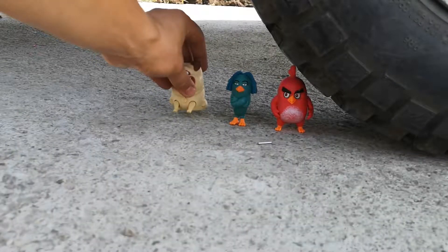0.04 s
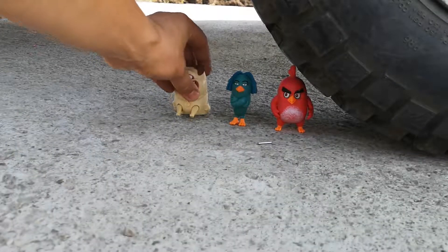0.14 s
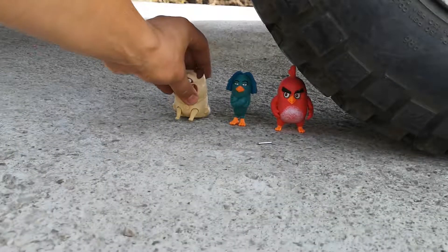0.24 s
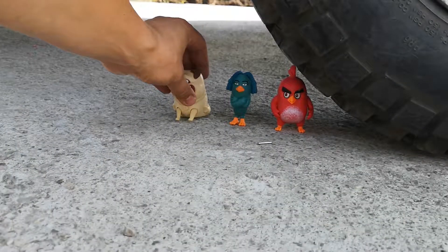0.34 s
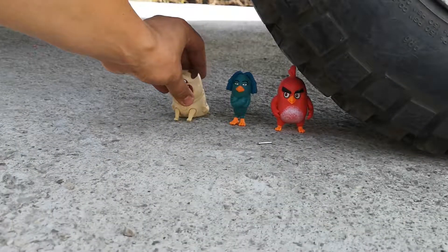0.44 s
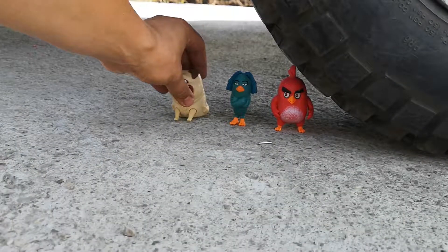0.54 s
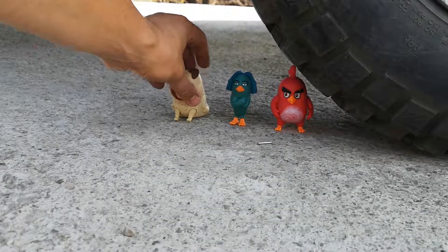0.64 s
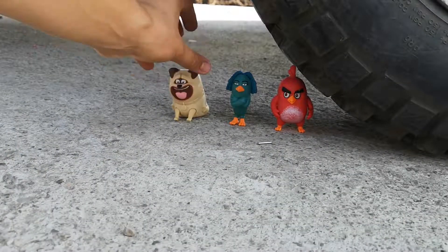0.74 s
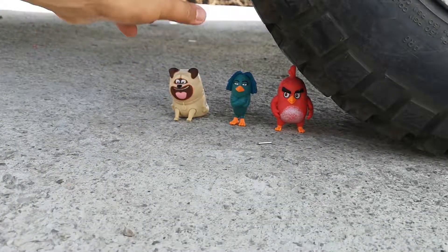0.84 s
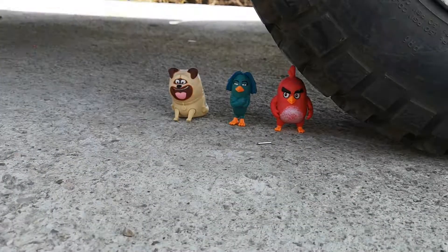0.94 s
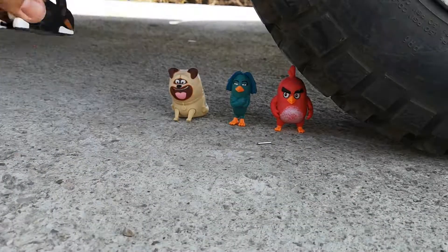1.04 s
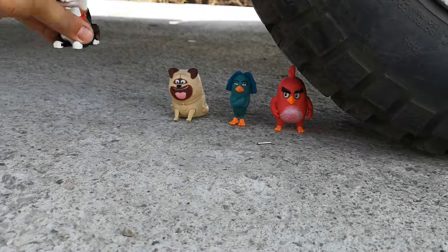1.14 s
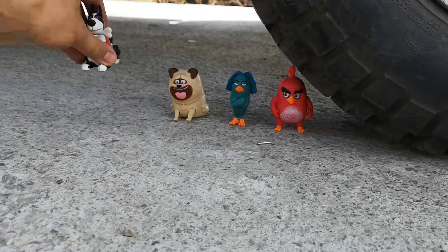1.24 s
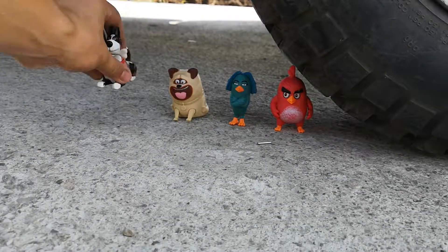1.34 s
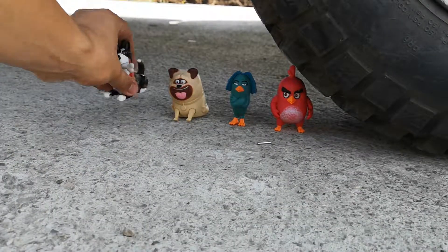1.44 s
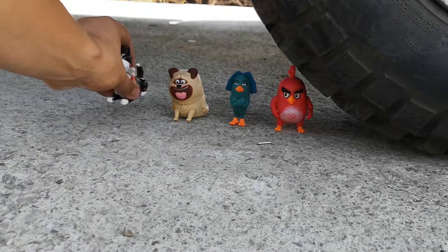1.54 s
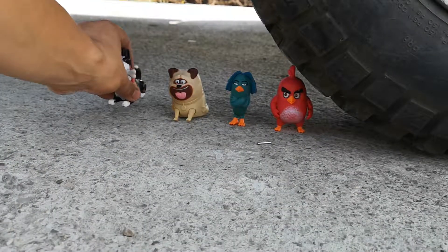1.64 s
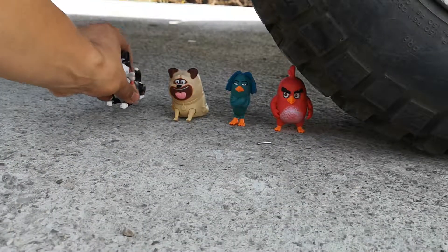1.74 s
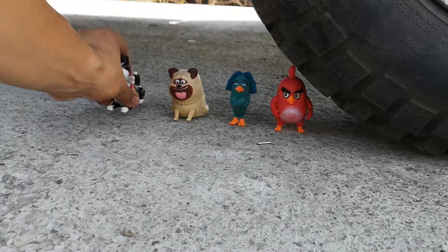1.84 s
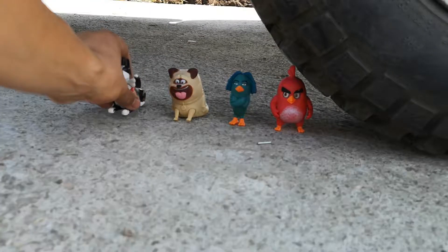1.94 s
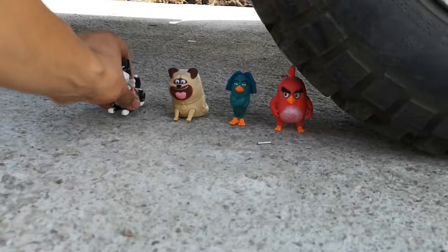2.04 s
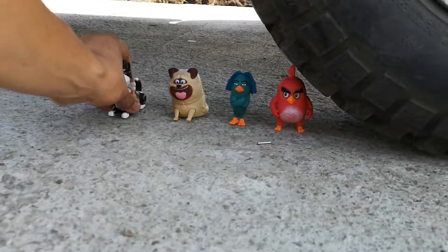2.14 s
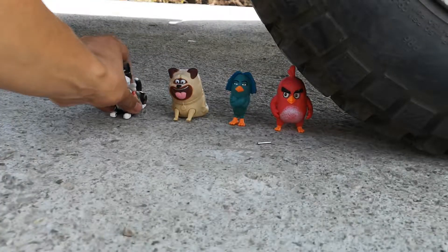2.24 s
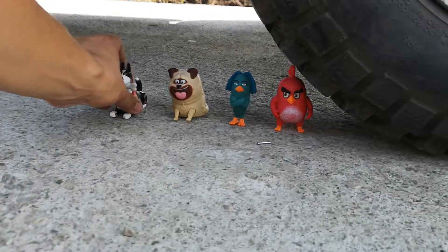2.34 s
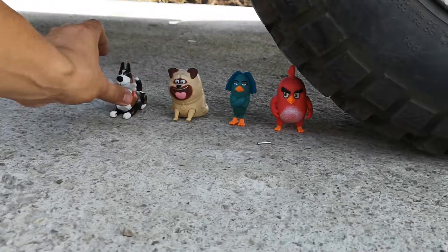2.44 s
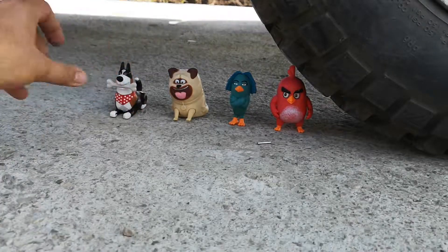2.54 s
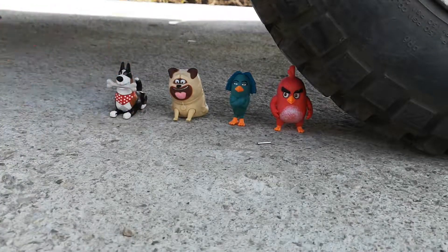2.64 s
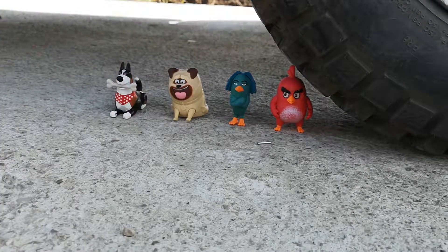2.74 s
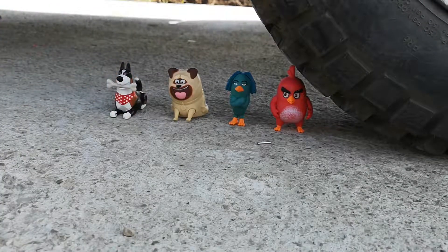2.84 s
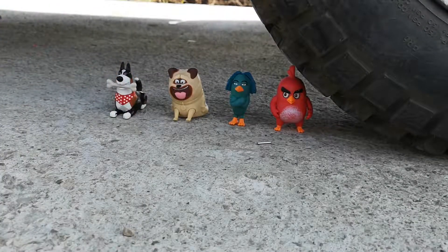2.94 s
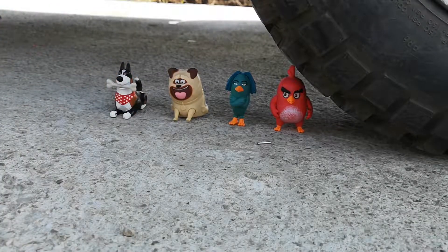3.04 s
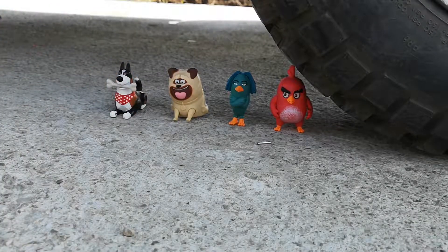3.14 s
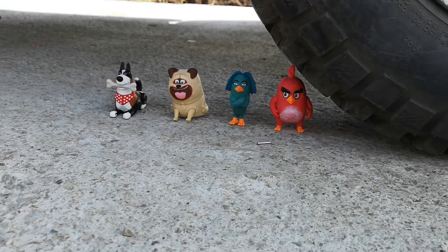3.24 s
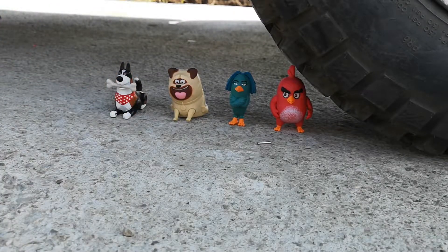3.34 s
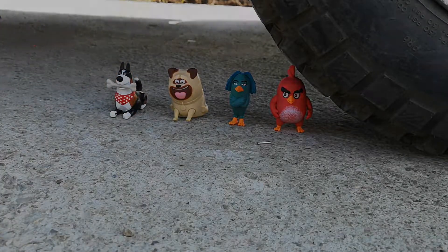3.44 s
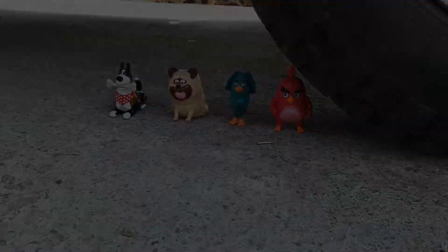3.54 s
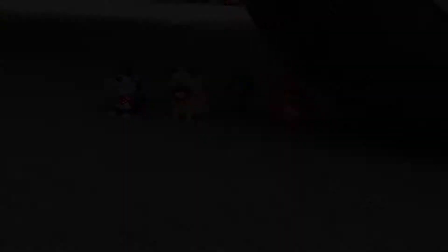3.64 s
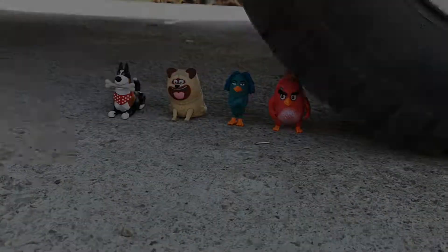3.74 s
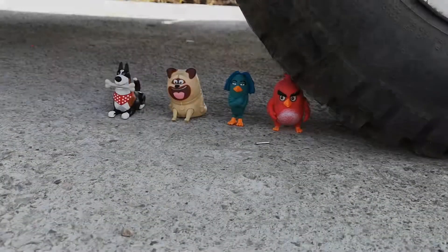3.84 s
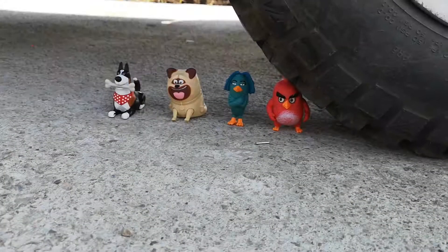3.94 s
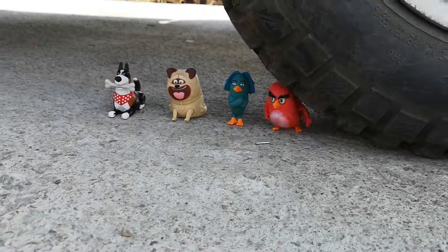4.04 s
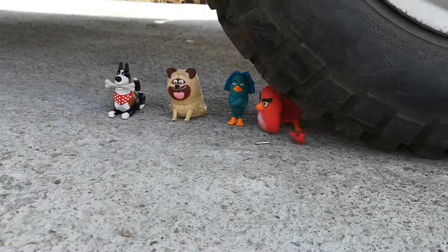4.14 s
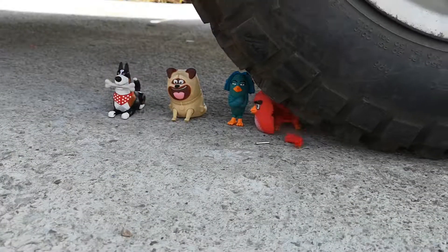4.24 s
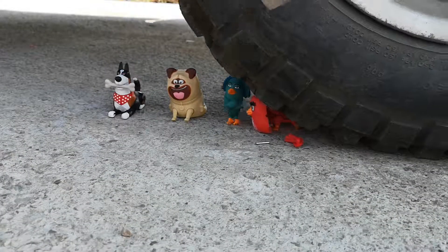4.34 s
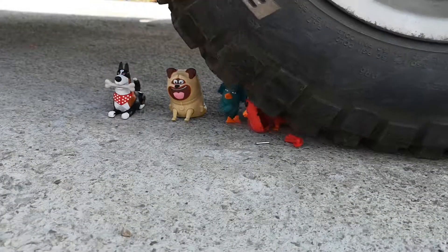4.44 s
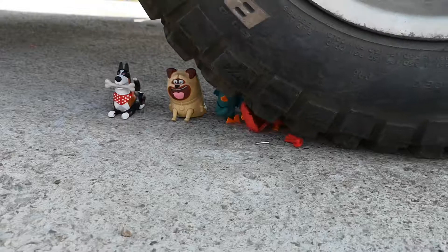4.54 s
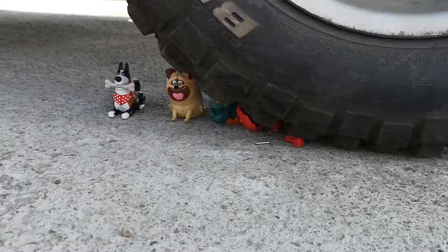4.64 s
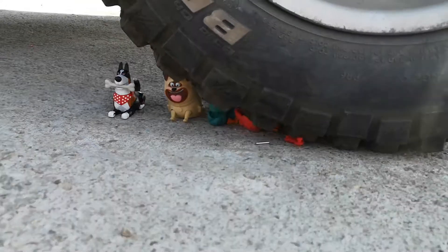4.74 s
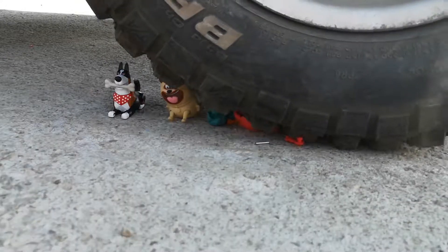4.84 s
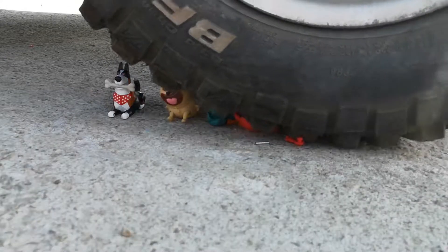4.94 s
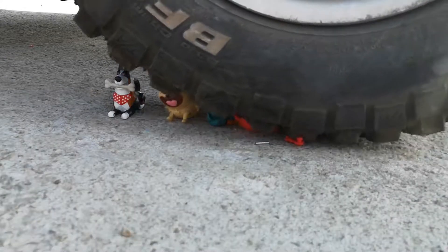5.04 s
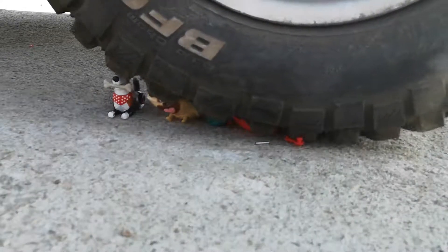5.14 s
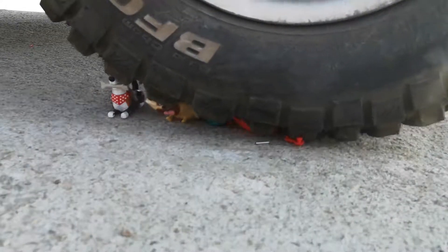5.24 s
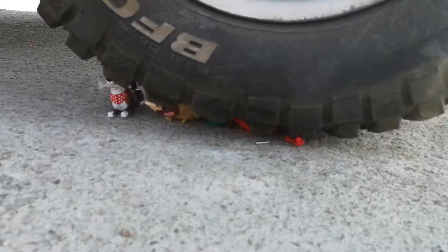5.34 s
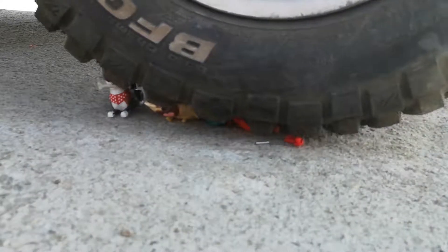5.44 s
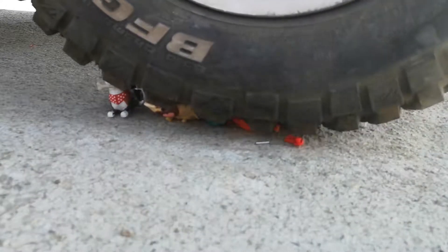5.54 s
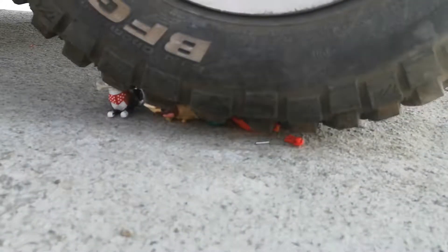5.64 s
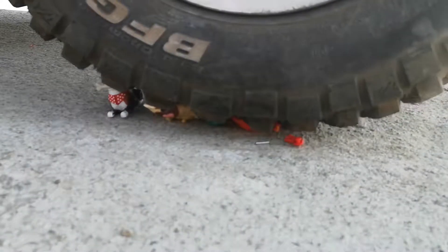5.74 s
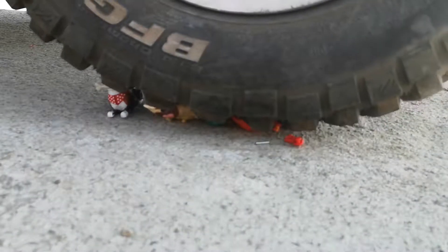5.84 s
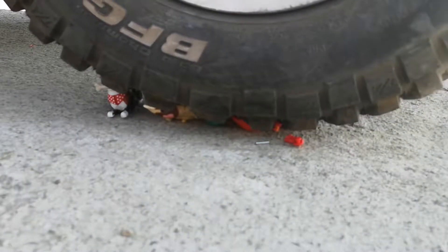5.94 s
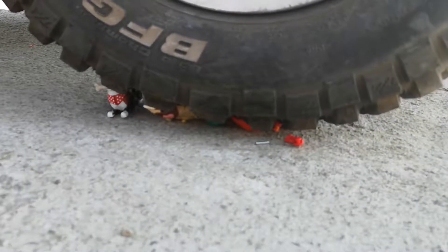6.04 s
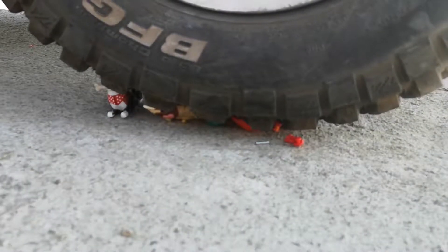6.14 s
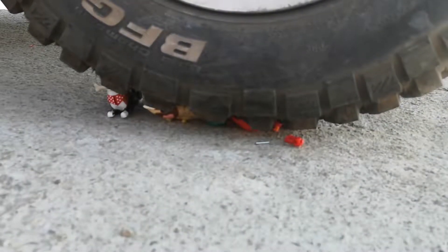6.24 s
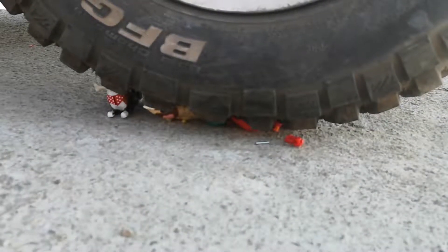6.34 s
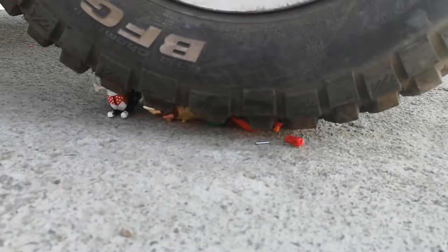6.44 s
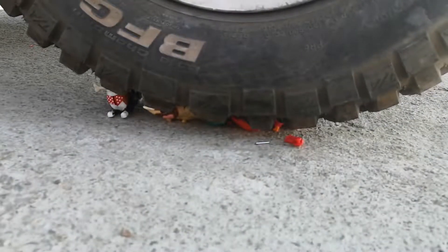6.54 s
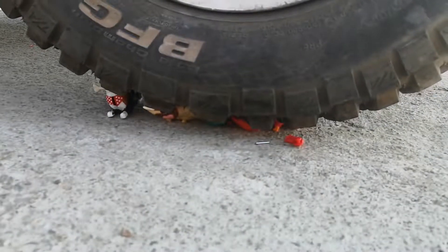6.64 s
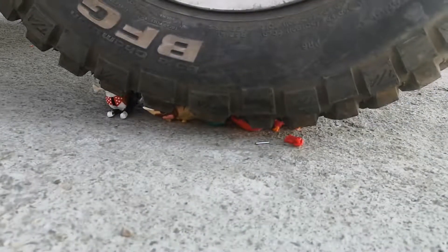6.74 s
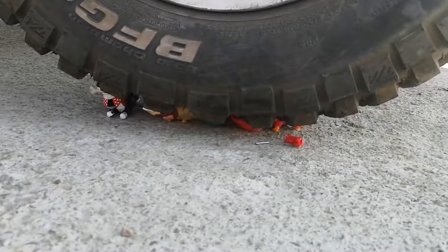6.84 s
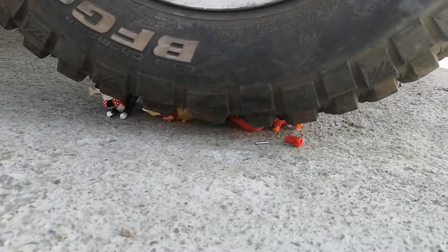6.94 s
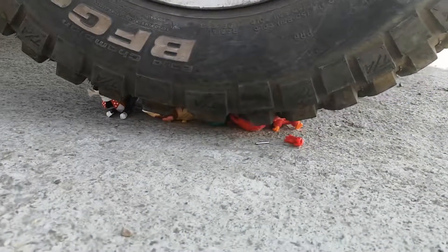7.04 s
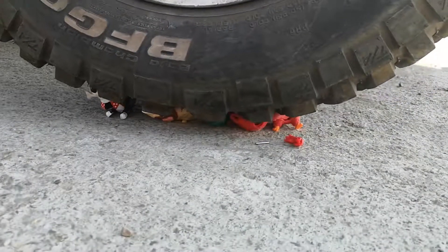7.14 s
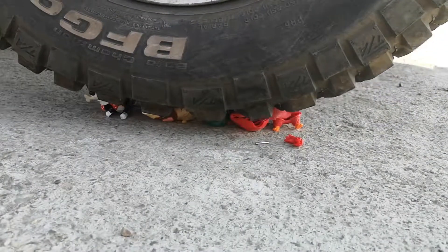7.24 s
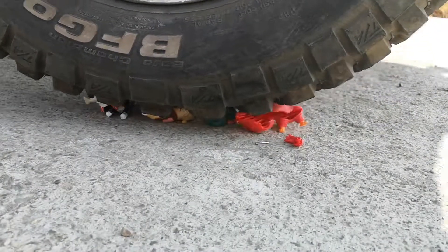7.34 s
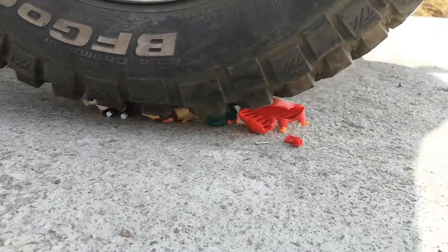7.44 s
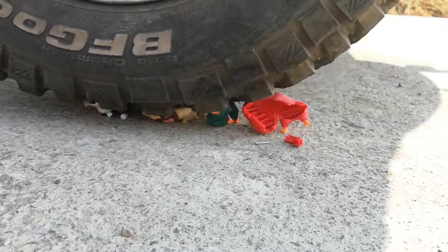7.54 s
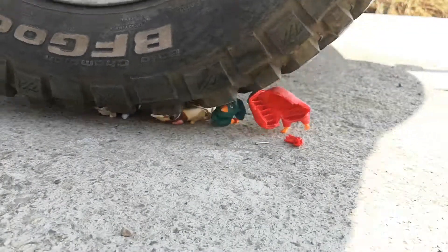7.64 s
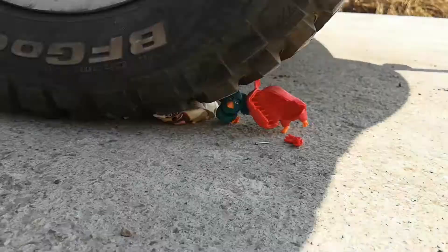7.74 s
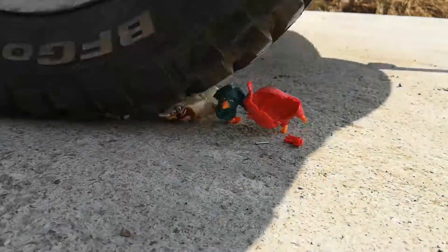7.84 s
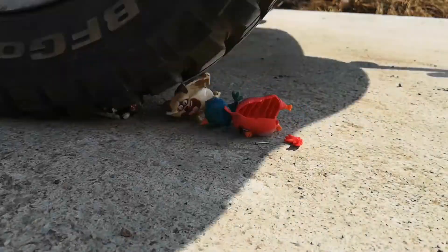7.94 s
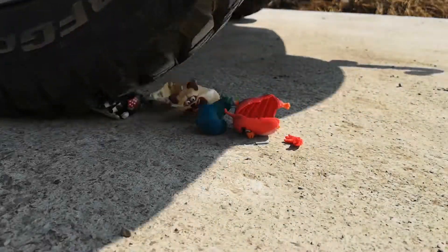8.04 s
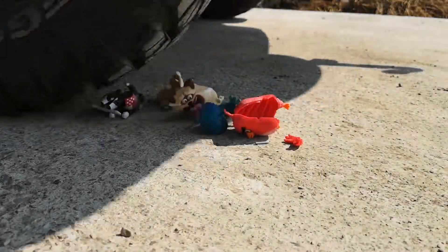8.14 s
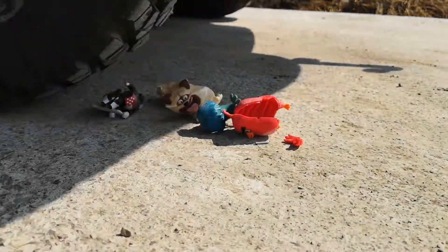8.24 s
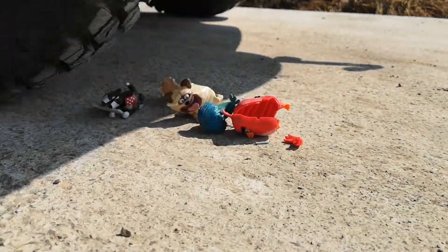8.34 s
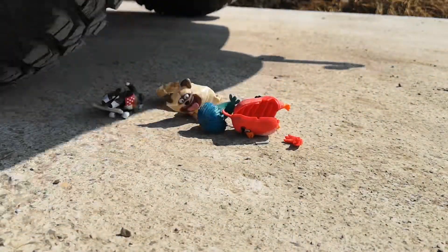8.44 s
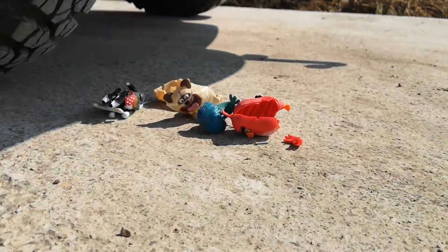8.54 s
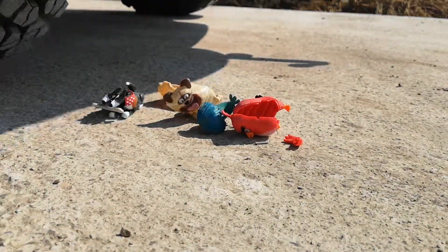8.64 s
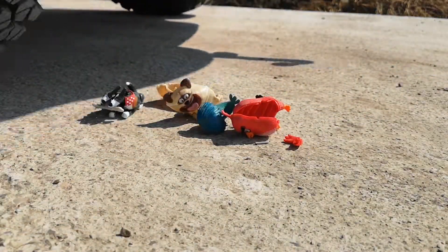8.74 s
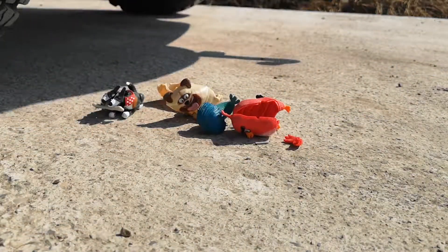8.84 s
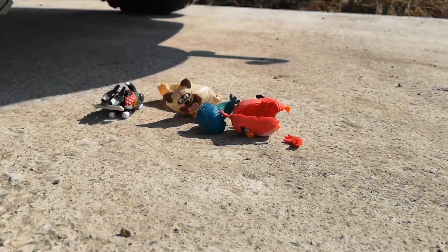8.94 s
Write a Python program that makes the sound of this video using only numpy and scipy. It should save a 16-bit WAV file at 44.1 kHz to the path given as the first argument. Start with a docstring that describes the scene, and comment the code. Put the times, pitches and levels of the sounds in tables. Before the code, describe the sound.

A close, low stereo microphone hears a diesel car idling steadily, clattering over deep exhaust throb with faint belt whine and thin pulley squeal. After a short lurch, the tyre creeps over hollow plastic figures: tiny snaps, then very loud brittle crunches. A labouring growl fills the pause, scattered cracks resume and cluster as the wheel rolls off, then the idle recedes slightly with a soft drive whir. Dry open air, short reflections from the car's underside.

```python
"""Hollow plastic toys crack one after another on concrete under the tyre of an idling four-cylinder diesel.
Each crack is torn noise through shell, flap and wall resonances, and the car's underside answers it.
The engine is firing-rate tones plus noise bursts and vibration in step with the firings; it growls under load.
Belt whine, a pulley squeal, rolling grit and a drive whir lie behind.
A limiter ducks everything after loud cracks."""
import sys
import numpy as np
from scipy import signal
from scipy.fft import rfft, irfft, next_fast_len
from scipy.io import wavfile
from scipy.ndimage import uniform_filter1d, minimum_filter1d, map_coordinates

SR = 44100
rng = np.random.default_rng(int(sys.argv[2]) if len(sys.argv) > 2 else 0)


def wav_out(sig):
    """Save sig, one row per channel (or a flat mono array), as 16-bit PCM at SR to the path in sys.argv[1]."""
    wavfile.write(sys.argv[1], SR, np.round(np.clip(np.atleast_2d(sig).T, -1, 1) * 32767).astype(np.int16))


N = 396900

# cracking shells: (time [s], decay [s], shell [Hz], shell level [dB], torn flap [Hz], flap level [dB],
# snap [Hz], snap level [dB], left-right [dB])
CRACKS = [(4.0441, 0.0015, 3580, -17.5, 1370, -14.5, 8800, -31, 7),
          (4.046, 0.0035, 1540, -25, 3700, -20.5, 8620, -21.5, -3),
          (4.707, 0.0015, 1790, -26.5, 3310, -17.0, 7360, -11, 2),
          (4.8226, 0.0023, 2590, -23, 1600, -39, 7340, -26, -2),
          (4.8286, 0.0053, 2360, -22.0, 2270, -21, 7820, -22.5, 2),
          (4.929, 0.0022, 2700, -9.5, 8700, -7.5, 5660, -8.5, -1.5),
          (4.956, 0.0021, 2220, 4, 2040, 5, 8130, 0.5, 0.5),
          (5.059, 0.0036, 1590, 7, 2700, -1, 7900, 3, -3.5),
          (5.066, 0.0048, 2440, -9, 1330, -13, 8020, -9, -2),
          (5.0728, 0.0021, 1690, 2.0, 1200, -15, 7900, -2, -5),
          (5.0872, 0.0013, 1820, -5, 1750, -7, 7940, -10, 7),
          (5.092, 0.002, 2260, 8, 1810, 7.5, 8400, 4, 0.5),
          (5.1447, 0.0016, 2490, -9.5, 2520, -17, 8730, -22, 3.5),
          (5.2154, 0.0015, 2500, 4.5, 1680, 3.5, 8950, -6, -1.5),
          (5.279, 0.00081, 2010, -11.5, 1610, -17.5, 7070, -38, -1),
          (5.4644, 0.0021, 2165, 9.5, 2100, 5.5, 7870, 3.5, -3.5),
          (6.626, 0.0009, 1400, -29.5, 4950, -24, 7800, -20.5, -2),
          (6.6803, 0.0017, 1400, -51, 3490, -21.5, 7600, -21.0, 2),
          (6.8287, 0.0016, 1660, -7.5, 3330, -13, 7800, -1.5, -4.5),
          (7.4577, 0.00049, 1960, -1, 2040, -2, 7660, 1.5, 1.5),
          (7.495, 0.00023, 2830, -13, 2150, -9.5, 7100, -10.5, 5),
          (7.5128, 0.00082, 2870, -28, 2150, -15, 6800, -9.5, 4),
          (7.5639, 0.0019, 1410, -19, 5310, -16, 5800, -1, -2),
          (7.5926, 0.004, 1480, -20, 2530, -18.0, 7560, -23, -2),
          (7.611, 0.0031, 2640, -13.5, 1650, -21, 6780, -15.5, 1),
          (7.624, 0.0027, 2180, -16.5, 2100, -13.5, 7300, -20.5, 6),
          (7.6353, 0.0014, 1400, -24, 5430, -10, 5310, -17, -2),
          (7.6471, 0.00087, 2030, -8, 8100, -4, 5300, -1.5, 1),
          (7.65, 0.0014, 1810, -26, 7040, -19, 5360, -16, 8),
          (7.6782, 0.00091, 1460, -15, 3890, -15, 7200, 4, -3),
          (7.6835, 0.0011, 2740, 1.5, 2570, 6, 7950, 4.5, 0),
          (7.6945, 0.0014, 2460, 2.0, 1770, -5, 7950, -8, 3),
          (7.8043, 0.0016, 1410, -25.5, 2480, -21, 8670, -48, 0),
          (7.8566, 0.0031, 1420, -32, 2520, -13.5, 8600, -34.5, -4),
          (7.8589, 0.0022, 2450, -8, 1200, -17.5, 8850, -25, -1),
          (7.8894, 0.0035, 1660, -11, 1470, -13, 7300, -23.0, -2),
          (8.1035, 0.0036, 3100, -25.5, 1860, -22, 8100, -23.5, 1.5)]
# thin splinters snapping off: (time [s], level [dB], pitch [Hz], left-right [dB])
SPLINTERS = [(4.1294, -35.5, 7260, -18), (4.2888, -41, 8500, -8), (4.567, -41, 8000, -9),
             (4.597, -32, 8450, -9), (4.641, -37, 8050, -9), (4.672, -43, 8500, -6),
             (4.692, -30, 10500, -9), (4.763, -38, 8400, -3), (4.845, -28, 8500, 3), (4.859, -25, 8400, -6),
             (4.8834, -10, 8200, 3), (4.9027, -17, 8360, -10), (5.01, -21.5, 8100, -7),
             (5.0525, -33, 8200, -2), (5.331, -32, 6100, -4), (5.8343, -26.5, 8250, -6),
             (6.599, -25, 5250, -9), (6.8604, -14.5, 7450, 4.5), (6.9955, -11.5, 8250, 2),
             (7.109, -37, 7500, -13), (7.138, -27, 7950, -8), (7.209, -35, 7860, 2), (7.265, -19, 5800, -1),
             (7.2834, -25.5, 6760, -2), (7.356, -35, 5900, -1), (7.4947, -10, 6950, 8),
             (7.555, -23, 7200, -5), (7.764, -39, 8500, -4), (8.232, -41, 6980, -6)]
# scuffs and small knocks of toys, mostly brief: (time [s], decay [s], main resonance [Hz], level [dB])
SCUFFS = [(3.306, 0.0044, 1810, -24.5), (3.352, .002, 1980, -34), (3.385, 0.0028, 1400, -32),
          (3.473, .010, 1680, -27.5), (4.129, 0.0013, 1650, -27), (4.138, 0.00028, 2000, -26),
          (4.241, 0.0024, 1960, -31.5), (4.289, 0.001, 3040, -32.5), (4.437, .002, 2580, -39),
          (8.016, 0.012, 1680, -27.5), (8.074, 0.029, 2100, -21.5), (8.13, .003, 2280, -35),
          (8.774, 0.0043, 1680, -38), (8.807, 0.0027, 1620, -33)]
# thumps as the car takes up its slack and a toy gives way: (time [s], decay [s], level [dB])
THUMPS = [(3.675, 0.003, -26), (4.046, 0.0015, -29.5), (4.701, 0.0022, -30), (4.823, 0.0074, -25)]
CRACK_THUD_DB = -20.5  # against the snap
UNDERSIDE_DB = -11.0  # against the direct sound


def cracks():
    """Shells crack with a ring, splinters only snap, scuffs are mostly brief, thumps dull; the underside answers."""
    hits = [(s, pan(lr) * crack(s, *shape, CRACK_THUD_DB)) for s, *shape, lr in CRACKS]
    hits += [(s, amp(db) * pan(lr) * splinter(hz)) for s, db, hz, lr in SPLINTERS]
    hits += [(s, amp(db) * scuff(s, decay_s, hz)) for s, decay_s, hz, db in SCUFFS]
    hits += [(s, amp(db) * thump(decay_s)) for s, decay_s, db in THUMPS]
    out = np.zeros((2, N + SR))
    for s, direct in hits:
        answer = amp(UNDERSIDE_DB) * underside(direct)
        for part in (direct, answer):
            out[:, round(s * SR):][:, :part.shape[1]] += part
    return out[:, :N]


# modes of a hollow shell: (multiple of its main mode, width [Hz], level [dB])
SHELL = [(.7, 300, -5.5), (1, 378, 6.5), (1.3, 430, 0), (1.7, 600, -3.5), (2.3, 700, -12.5)]
FLAP_WIDTH_HZ = 265
# once the wheel sits on the toys, the rubber presses them harder on the concrete
COVERED_S, COVERED_THUD_DB = 6.2, 5.5


def crack(s, decay_s, shell_hz, shell_db, flap_hz, flap_db, snap_hz, snap_db, thud_db):
    """One split snaps the wall, rings the shell and the flap it tears loose, and thuds on the concrete."""
    split = tear(decay_s)
    shell = resonate(split, [(shell_hz * k, w, db) for k, w, db in SHELL])
    ring = blow(thin(dull(shell, hz=5450), hz=shell_hz / 2))
    flap = blow(thin(resonate(split, [(flap_hz, FLAP_WIDTH_HZ, 0)]), hz=flap_hz / 2))
    thud = blow(dull(resonate(split, [(376, 190, -0.35), (840, 340, 0.35)]), hz=1460))
    thud_db = thud_db + COVERED_THUD_DB * (s > COVERED_S)
    wall = snap(split, snap_hz) + amp(thud_db) * thud
    return amp(snap_db) * wall + amp(shell_db) * ring + amp(flap_db) * flap


JERK_SPREAD_DB, TEAR_SIDE = 7.5, 0.65  # a split runs unevenly and radiates differently to each port


def tear(decay_s):
    """Stereo excitation of a split: it opens at once, runs on in tiny jerks and holds all frequencies about equally."""
    t = np.arange(SR // 20 - 1) / SR
    jerks = rng.standard_normal((2, len(t))) * amp(JERK_SPREAD_DB * rng.standard_normal((2, len(t))))
    z = rfft(np.exp(-t / max(decay_s, 1 / SR)) * jerks)
    # divide by the minimum-phase form of the smoothed spectrum to whiten it
    power = np.abs(uniform_filter1d(np.abs(z) ** 2, size=15, axis=1))
    cepstrum = irfft(np.log(power + 1e-12) / 2)
    causal = 2 * (t < t[-1] / 2) - 1 * (t == 0)
    mid, side = irfft(z / np.exp(rfft(cepstrum * causal)))
    fade = np.minimum(1, 10 * (1 - t / t[-1]))
    return np.array([mid + TEAR_SIDE * side, mid - TEAR_SIDE * side]) * fade


# modes of the splitting wall: (multiple of its snap pitch, width [Hz], level [dB])
SNAP = [(.68, 1800, 2.5), (.88, 1050, 7.5), (1, 800, 9), (1.22, 1600, 0), (1.7, 2200, -12.5)]


def snap(split, hz):
    """The bright snap of the wall's modes."""
    return blow(resonate(split, [(hz * k, w, db) for k, w, db in SNAP]))


SMALL_SNAP_HZ = 7680  # wall snap of splinters and scuffs
SPLINTER_S, SPLINTER_WIDTH_HZ, SPLINTER_RING_DB, SPLINTER_SNAP_DB = 0.001, 570, -2, -0.5


def splinter(hz):
    """A sliver is too small to carry low notes: it only snaps and pings."""
    ping = blow(resonate(tear(SPLINTER_S), [(hz, SPLINTER_WIDTH_HZ, 0)]))
    wall = thin(snap(tear(SPLINTER_S), SMALL_SNAP_HZ), hz=4300)
    return thin(amp(SPLINTER_RING_DB) * ping + amp(SPLINTER_SNAP_DB) * wall, hz=3900)


SCUFF_EDGE_RATIO, SCUFF_EDGE_DB, SCUFF_SNAP_DB, SCUFF_THUD_DB = 1.07, -7, -9, -21


def scuff(s, decay_s, hz):
    """A scuffed or knocked toy rings like a cracked one; its edge rings just above the shell."""
    return crack(s, decay_s, hz, 0, hz * SCUFF_EDGE_RATIO, SCUFF_EDGE_DB,
                 SMALL_SNAP_HZ, SCUFF_SNAP_DB, SCUFF_THUD_DB)


# (centre [Hz], width [Hz], level [dB])
THUMP_MODES = [(345, 65, 6.5), (820, 190, -3)]


def thump(decay_s):
    """A soft, heavy contact: decaying noise through two low, broad modes."""
    t = np.arange(SR // 20) / SR
    noise = rng.standard_normal(len(t)) + .5 * rng.standard_normal((2, len(t)))
    push = noise * np.exp(-t / max(decay_s, 1 / SR))
    return blow(dull(resonate(push, THUMP_MODES), hz=1300))


# reverberation: (frequency [Hz], t60 [s])
UNDERSIDE = [(300, 0.16), (2000, 0.1), (8000, 0.077), (15000, 0.092)]


def underside(x):
    """Scattered answer from the wheel well and the floor of the car, different for each hit."""
    hz, t, z = signal.stft(rng.standard_normal((2, SR // 5)), SR, nperseg=256)
    decay = amp(-60 * t / along(UNDERSIDE, hz)[:, None])
    tail = signal.istft(z * decay, SR, nperseg=256)[1]
    return signal.fftconvolve(x, tail / np.linalg.norm(tail[0]), axes=1)


# idle sags as the clutch takes the load: (time [s], firing rate [1/s])
SPEED = [(0, 27.02), (3.55, 27.02), (3.68, 27.7), (3.85, 26.3), (4.3, 26.4), (4.8, 27.03), (9, 27.03)]
# boom swells: (time [s], level [dB])
SWELLS = [(2.42, 2.5), (5.72, 3), (6.3, 1.7), (7.2, 2.5), (8.45, 2.5)]
SWELL_WIDTH_S = 0.26
# the car draws away and its body screens the engine
LEAVE_S, LEAVE_SPAN_S = 5.36, 3.03


def engine():
    """Each firing pushes the exhaust, knocks the block and ticks an injector; belt and fan turn with the crank."""
    t = np.arange(N) / SR
    cycles = firing_count()
    firings = cycles + 1.16
    away = np.clip((t - LEAVE_S) / LEAVE_SPAN_S, 0, 1)
    swell_db = sum(db * np.exp(-((t - s) / SWELL_WIDTH_S) ** 2) for s, db in SWELLS)
    combustion = exhaust(cycles, swell_db) + body(cycles, firings, swell_db, away)
    return combustion + knock(firings, away) + rasp(firings, away) + belt_and_fan(cycles, away)


def firing_count():
    """Running count of firings: the integral of the firing rate."""
    speed, = curves(SPEED)
    return np.cumsum(speed) / SR


# exhaust tones: (multiple of the firing rate, level [dB])
ORDERS = [(1, -12), (2, -3), (3, -22), (4, -17.5), (5, -16), (6, -25.5), (7, -28.5), (8, -31)]
# exhaust noise: (frequency [Hz], density [dB per Hz])
THROB = [(12, -7.5), (25, -2), (60, 2), (100, -1.5), (150, -7), (200, -34), (400, -57)]
BOOM_DB, THROB_DB = -22, -9.5  # throb: against the boom


def exhaust(cycles, swell_db):
    """Pressure pulses sound as multiples of the firing rate, wavering slightly, over low noise."""
    tones = 0
    for k, db in ORDERS:
        phase = 2 * np.pi * k * (cycles - .14) + 0.071 * k * wobble(8)
        tones = tones + amp(db + 0.27 * wobble(7.7)) * np.cos(phase)
    throb = amp(THROB_DB + swell_db) * rush(THROB)
    return amp(BOOM_DB + swell_db) * (-np.sqrt(2) * tones + throb)


# (frequency [Hz], density [dB per Hz])
RUMBLE = [(90, -38), (150, 1.5), (200, 4), (255, -0.5), (290, -7), (380, -7), (460, -6), (620, -14.5),
          (1000, -16), (3000, -89)]
RUMBLE_DB, RUMBLE_LOSS_DB, RUMBLE_SWELL_SHARE = -35, 5.5, 0.73


def body(cycles, firings, swell_db, away):
    """The body shakes a quarter of a firing after each knock."""
    rumble_db = RUMBLE_DB + RUMBLE_SWELL_SHARE * swell_db - RUMBLE_LOSS_DB * away
    beat = bursts(firings - .25, rise=0.28, fall=0.4, steady=0.92, scatter_db=1.6)
    return amp(rumble_db) * shake(RUMBLE, cycles, steady=.25) * beat


# (frequency [Hz], density [dB per Hz])
KNOCK = [(350, -21), (550, 4.5), (800, 5.5), (1190, 4.5), (1330, -1.5), (1550, -2.5), (2000, 0.5),
         (2700, 2), (3200, -7.5), (4000, -15), (6000, -43)]
KNOCK_DB, CLATTER_DB, KNOCK_LOSS_DB = -38.5, -52.5, 3.5


def knock(firings, away):
    """Combustion knocks are noise bursts once a firing, with block clatter."""
    beat = bursts(firings, rise=.16, fall=.38, steady=.52, scatter_db=1.2)
    knocks = pan(2.4) * amp(KNOCK_DB - KNOCK_LOSS_DB * away) * rush(KNOCK) * beat
    return knocks + amp(CLATTER_DB - KNOCK_LOSS_DB * away) * clatter(firings, rate=900, spread_db=8.5)


# engine block modes: (centre [Hz], width [Hz], level [dB])
BLOCK = [(1200, 76, 5), (1753, 68, -11.5), (1900, 61, -6.5), (2100, 37, 1.5), (2323, 27, -0.5),
         (2590, 52, 0.5), (2744, 95, -0.5)]
# harder firings: (time [s], boost [dB])
HARD_FIRINGS = [(.633, 8), (.857, 11), (.93, 13), (1.04, 5), (1.93, 6)]


def clatter(firings, rate, spread_db):
    """Each firing sets off a cluster of small, uneven impacts that ring the block."""
    t = np.arange(N) / SR
    hard_db = sum(db * (np.abs(t - s) < .5 / SPEED[0][1]) for s, db in HARD_FIRINGS)
    ticks = (rng.random((2, N)) < rate / SR) * rng.choice([-1, 1], (2, N))
    ticks = ticks * amp(spread_db * rng.uniform(-1.1, 1, (2, N)))
    cluster = bursts(firings, rise=.08, fall=.3, steady=.3, scatter_db=2)
    ringing = resonate(ticks * cluster * amp(hard_db), BLOCK)
    return unit(dull(thin(ringing, hz=895), hz=4500))


# (frequency [Hz], density [dB per Hz])
RASP = [(2200, -10.5), (3700, 5.5), (4700, 0), (5400, 4.5), (6200, -2), (7800, 0.5), (9000, -5.5),
        (10500, -15.5), (12000, -24), (15000, -27)]
# clutch bites: (start [s], attack [s], hold [s], release [s])
CLUTCH = (2.8, 0.15, 1.2, 0.19)
RASP_DB, RASP_LOSS_DB, CLUTCH_RASP_DB = -45.5, 5.5, 1.5


def rasp(firings, away):
    """Injectors tick as bright noise bursts, louder while the clutch bites."""
    rasp_db = RASP_DB + CLUTCH_RASP_DB * envelope(*CLUTCH) - RASP_LOSS_DB * away
    return amp(rasp_db) * rush(RASP) * bursts(firings, rise=0.24, fall=0.21, steady=0.8, scatter_db=1.2)


# cooling fan tones: (frequency at idle [Hz], level [dB])
FAN = [(91, -33), (257, -52)]
# belt-driven pump and alternator: (frequency at idle [Hz], level [dB], left-right [dB])
WHINES = [(447, -57.5, 15.5), (670, -61.5, 10), (788, -61, 13), (973, -54, -1), (1029, -64, -3)]
BELT_DB, BELT_LOSS_DB = 0.7, 6


def belt_and_fan(cycles, away):
    """Fan, pump and alternator sing at pitches that follow engine speed, with wavering level and phase."""
    belt = cycles / SPEED[0][1]  # seconds at idle speed
    fan = whine = 0
    for hz, db in FAN:
        fan = fan + amp(db + 1.8 * wobble(3.4)) * np.sin(2 * np.pi * hz * belt + 1.03 * wobble(4.7))
    for hz, db, lr in WHINES:
        tone = np.sin(2 * np.pi * hz * belt + 1.06 * wobble(20))
        whine = whine + pan(lr) * amp(db + 1.9 * wobble(6)) * tone
    return np.sqrt(2) * (fan + amp(BELT_DB - BELT_LOSS_DB * away ** 2) * whine)


# pulls to move off, lift the wheel over the toys and drive on:
# (start [s], hold [s], release [s], effort [dB], knock easing [s])
PULLS = [(3.633, 0.018, 0.093, -1.5, .15), (5.913, 0.52, 0.2, -1, 0.69), (6.995, 2.5, .3, -13, 3.2)]
# (frequency [Hz], density [dB per Hz])
GROWL = [(130, -42), (185, 7.5), (250, 5.5), (285, -4.5), (312, -5), (345, -8), (440, -9.5), (650, -59)]
# (frequency [Hz], density [dB per Hz])
HARD_KNOCK = [(300, -48), (1250, -13), (1620, 2), (2050, -1), (2450, 4), (2900, -10), (3600, -13),
              (10000, -82)]
PULL_ATTACK_S = 0.056
HARD_KNOCK_DB, GROWL_DB, GROWL_POWER = -31.5, -29, 1.33  # at full effort; the growl grows faster than effort


def labour():
    """Under load the body growls; the block knocks hardest as each pull begins."""
    t = np.arange(N) / SR
    firings = firing_count() + 1.12
    effort = knocking = 0
    for s, hold, release, db, ease in PULLS:
        pull = amp(db) * envelope(s, PULL_ATTACK_S, hold, release)
        effort = effort + pull
        knocking = knocking + pull * np.exp(-np.maximum(t - s, 0) / ease)
    beat = bursts(firings, rise=.2, fall=.5, steady=.8, scatter_db=1)
    growl = amp(GROWL_DB) * effort ** GROWL_POWER * shake(GROWL, firings, steady=0.28)
    return beat * (amp(HARD_KNOCK_DB) * knocking * rush(HARD_KNOCK) + growl)


# tread on sand and splinters: (start [s], hold [s], level [dB])
ROLLS = [(3.125, 2.5, -47), (4.48, 0.19, -52), (6.497, 0.59, -42.5), (7.824, 0.11, -42.5)]
ROLL_ATTACK_S, ROLL_RELEASE_S = 0.058, 0.46


def grit(rate, spread_db):
    """Sand grains and splinters tick under the rolling tread: random impulses through broad modes."""
    level = sum(amp(db) * envelope(s, ROLL_ATTACK_S, hold, ROLL_RELEASE_S) for s, hold, db in ROLLS)
    sizes = amp(spread_db * np.clip(rng.standard_normal((2, N)), -2, 2))
    ticks = (rng.random((2, N)) < rate / SR) * sizes
    ringing = resonate(ticks, [(1920, 780, 5.5), (5430, 1200, -1.0), (8050, 2700, -3.0)])
    return level * unit(dull(ringing, hz=7500))


# (start [s], hold [s], level [dB])
SQUEALS = [(0.838, 0.081, -48), (2.6, 5.3, -52), (8.25, 0.55, -52.5)]
# wheel on the toys: (start [s], attack [s], hold [s], release [s])
ON_TOYS = (3.7, 0.67, 3.9, 0.51)
SQUEAL_ATTACK_S, SQUEAL_RELEASE_S, SQUEAL_FLOOR_DB = 0.16, 0.5, -65.5
SQUEAL_HZ, SQUEAL_SAG_HZ = 1110, 71.2  # flatter while the wheel is on the toys
SQUEAL_PEAK_S = 8.31  # reference time of the swells


def squeal(waver, flutter_db, swell_hz, swing_db, bend_hz):
    """A thin pulley tone whose level and pitch swing up together about six times a second."""
    singing = amp(SQUEAL_FLOOR_DB)
    for s, hold, db in SQUEALS:
        singing = singing + amp(db) * envelope(s, SQUEAL_ATTACK_S, hold, SQUEAL_RELEASE_S)
    swing = np.cos(2 * np.pi * swell_hz * (np.arange(N) / SR - SQUEAL_PEAK_S) + 0.23 * wobble(4.6))
    hz = SQUEAL_HZ - SQUEAL_SAG_HZ * envelope(*ON_TOYS) + bend_hz * swing
    level = singing * amp(swing_db * swing + flutter_db * wobble(30))
    return pan(2) * level * np.sin(2 * np.pi * np.cumsum(hz) / SR + waver * wobble(60))


# (start [s], attack [s], hold [s], release [s])
DRIVE_OFF = (8, 0.66, 2, .3)
# (frequency [Hz], density [dB per Hz])
WHIR = [(1500, -30), (1700, -1), (1950, -14), (2090, 14), (2200, -7), (2450, -21), (2650, -9), (2950, -35),
        (6000, -70)]
WHIR_DB = -48


def drive_whir():
    """The drive whirs as the car rolls off: noise peaking near 2.1 kHz."""
    return amp(WHIR_DB) * envelope(*DRIVE_OFF) * rush(WHIR)


def bursts(firings, rise, fall, steady, scatter_db):
    """Envelope of rms 1 that swells and dies once a firing (rise, fall in firings); firing sizes are random."""
    age, index = firings % 1, np.floor(firings).astype(int)
    size = amp(scatter_db * rng.standard_normal(index.max() + 1))[index]
    shape = unit((1 - np.exp(-(age / rise) ** 2)) * np.exp(-age / fall))
    return unit(np.sqrt(steady ** 2 + (size * shape) ** 2))


def shake(spectrum, cycles, steady):
    """Vibration: a steady share of power repeats with each crank turn (two firings), the rest is noise."""
    hz = np.arange(64) * SPEED[0][1] / 2
    partials = amp(along(spectrum, hz)) * np.exp(2j * np.pi * rng.random(len(hz)))
    one_turn = irfft(partials, 4096)
    position = cycles / 2 % 1 * len(one_turn)
    repeating = unit(np.interp(position, np.arange(len(one_turn)), one_turn))
    return np.sqrt(steady) * repeating + np.sqrt(1 - steady) * rush(spectrum)


# (frequency [Hz], left-right likeness [-1 to 1])
ALIKE = [(60, 0.94), (130, 0.86), (290, 0.56), (640, -1.02), (1400, 0.091), (15000, -0.0054)]


def rush(spectrum):
    """Stereo noise of rms 1, alike in the bass and diffuse above."""
    def mid_side(hz):
        turn = np.arccos(np.clip(along(ALIKE, hz), -1, 1)) / 2
        return amp(along(spectrum, hz)) * np.array([np.cos(turn), np.sin(turn)])
    mid, side = filtered(rng.standard_normal((2, N)), mid_side)
    return unit(np.array([mid + side, mid - side]))


def resonate(x, modes):
    """x through (centre [Hz], width [Hz], level [dB]) resonances of alternating sign."""
    def response(f):
        total = 0
        for k, (c, w, db) in enumerate(modes):
            total = total + (-1) ** k * amp(db) * 1j * f * w / (c * c - f * f + 1j * f * w)
        return total
    return filtered(x, response)


def dull(x, hz):
    """Rounded contact: little is left above hz."""
    return filtered(x, lambda f: 1 / (1 + 1j * np.sqrt(2) * f / hz - (f / hz) ** 2))


def thin(x, hz):
    """A small radiator: little is left below hz."""
    return filtered(x, lambda f: -(f / hz) ** 2 / (1 + 1j * np.sqrt(2) * f / hz - (f / hz) ** 2))


def filtered(x, response):
    """x times a complex response of frequency."""
    n = x.shape[-1]
    m = next_fast_len(n + n // 10)
    return irfft(rfft(x, m) * response(np.fft.rfftfreq(m, 1 / SR)), m)[..., :n]


def blow(x):
    """x scaled to the energy of 10 ms at rms 1."""
    return x / np.sqrt(np.sum(x ** 2) / (.01 * SR))


def envelope(start, attack, hold, release):
    """Rises from 0 to 1, holds and falls back; all in seconds."""
    return np.interp(np.arange(N) / SR, start + np.cumsum([0, attack, hold, release]), [0, 1, 1, 0])


def wobble(rate):
    """A smooth random curve, rate knots a second."""
    return map_coordinates(rng.standard_normal(int(N * rate / SR) + 4), [np.arange(N) * rate / SR])


def curves(rows):
    """One value per sample for each column after the time."""
    s, *cols = np.transpose(rows)
    return [np.interp(np.arange(N) / SR, s, c) for c in cols]


def along(points, hz):
    """Interpolates (frequency [Hz], value) points on a log axis."""
    f, v = np.transpose(points)
    return np.interp(np.log(hz + 1), np.log(f + 1), v)


def pan(db):
    """Left and right gains for a level difference."""
    return amp(np.array([[.5], [-.5]]) * db)


def unit(x):
    """x scaled to rms 1."""
    return x / np.sqrt(np.mean(x ** 2) + 1e-20)


def amp(db):
    """Decibels to amplitude."""
    return 10 ** (np.asarray(db) / 20)


PORT_DELAY_S = .00016


def scene():
    """The cracks reach the left microphone port a moment before the right; the car and grit are added."""
    side = np.array([[1], [-1]])
    toys = filtered(cracks(), lambda hz: np.exp(1j * np.pi * hz * PORT_DELAY_S / 2 * side))
    car = engine() + labour() + drive_whir()
    car = car + squeal(waver=0.57, flutter_db=1.5, swell_hz=6.1, swing_db=4.0, bend_hz=5.2)
    return toys + car + grit(rate=200, spread_db=3.5)


def limiter(x, ceiling_db, release):
    """A loud millisecond pulls the gain down at once; it creeps back over the release time [s]."""
    power = np.abs(uniform_filter1d(np.mean(x ** 2, axis=0), size=45))
    over_db = np.maximum(10 * np.log10(power + 1e-12) - ceiling_db, 1e-9)
    age = np.arange(N) / SR / release
    # running maximum of exponentially decaying cuts
    cut_db = np.exp(np.maximum.accumulate(np.log(over_db) + age) - age)
    return x * uniform_filter1d(minimum_filter1d(amp(-cut_db), size=45), size=45)


# microphone ports: (frequency [Hz], left-right [dB])
PORTS = [(100, -.5), (500, 2), (1300, 1.5), (2400, 0), (4400, 1), (6500, 7), (8000, 11.5), (9600, -2),
         (15000, 0.5)]
TOP_HZ = 15500


def record(dry):
    """The two ports colour the sound differently; then come the limiter, soft clipping and the band limit."""
    coloured = filtered(dry, lambda hz: pan(along(PORTS, hz)))
    heard = limiter(coloured, ceiling_db=-7.5, release=0.12)
    clipped = heard / (1 + heard ** 4) ** (1 / 4)
    return filtered(clipped, lambda hz: 1 / np.sqrt(1 + (hz / TOP_HZ) ** 80))


dry = scene()
out = record(dry)
wav_out(out)
```